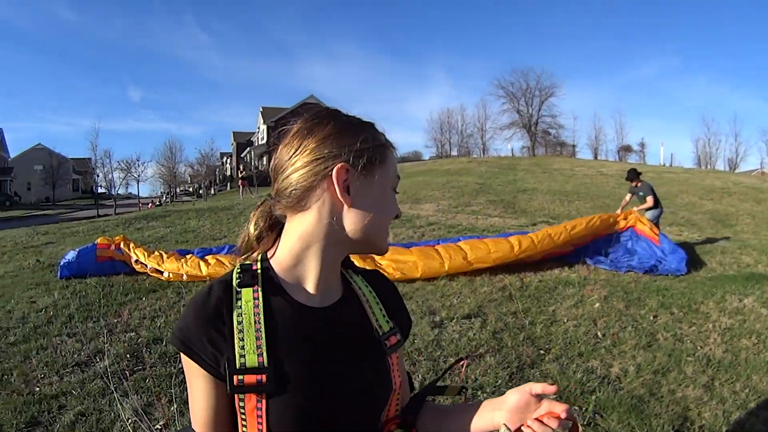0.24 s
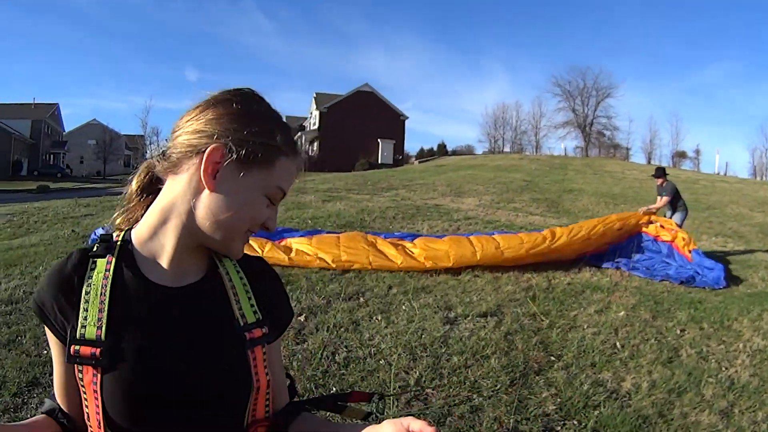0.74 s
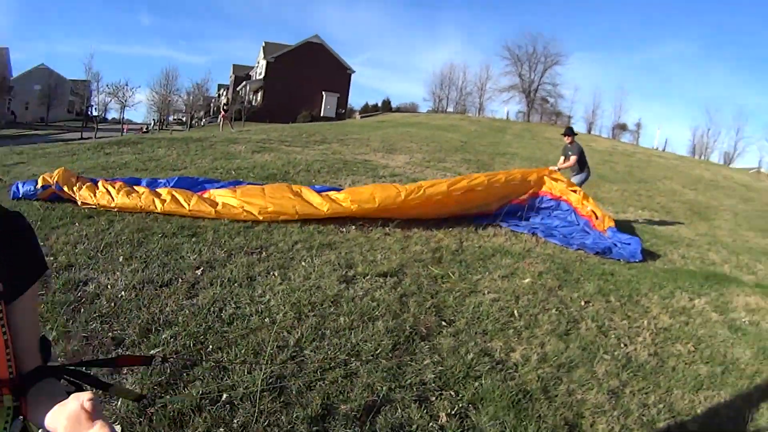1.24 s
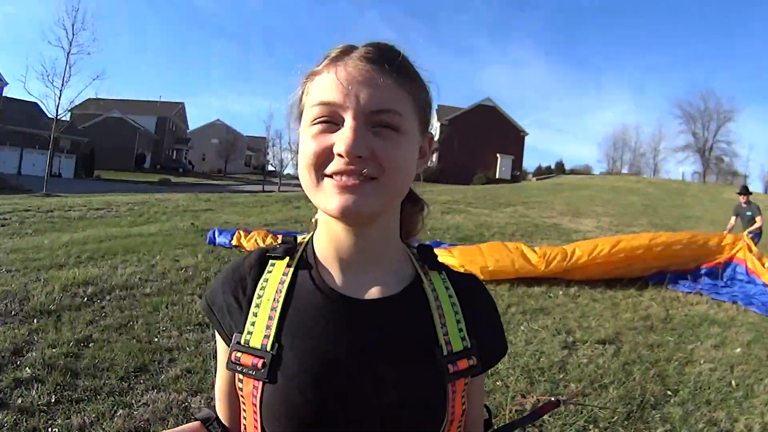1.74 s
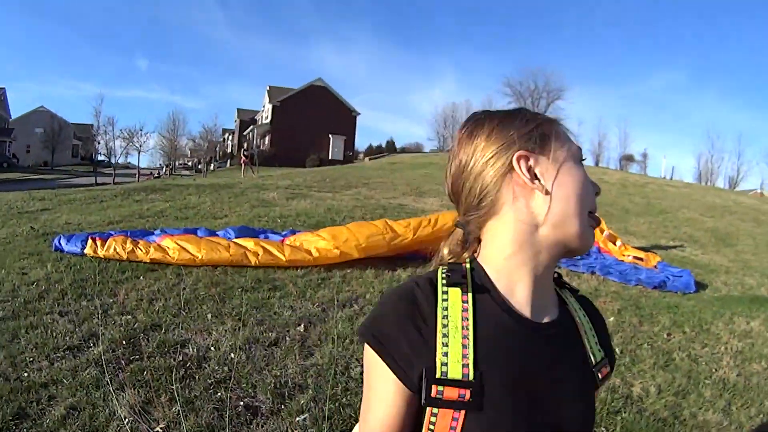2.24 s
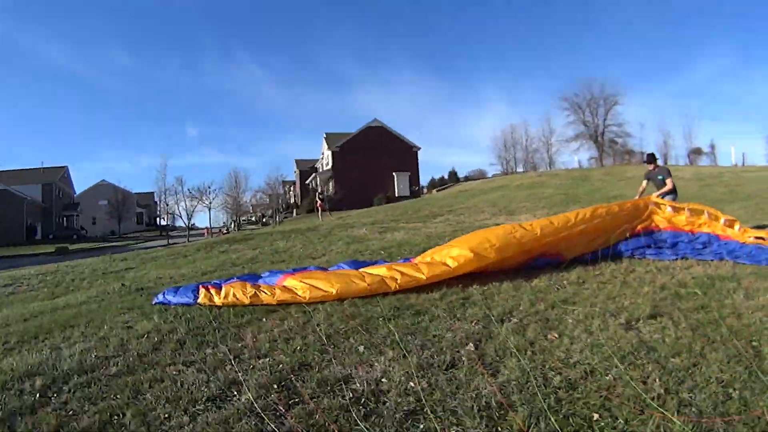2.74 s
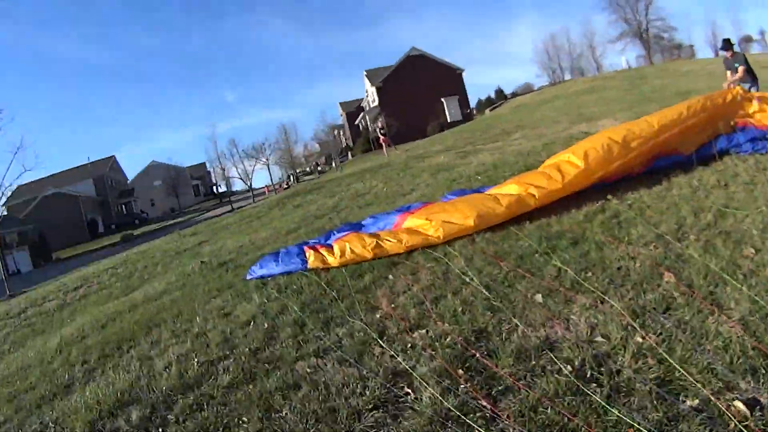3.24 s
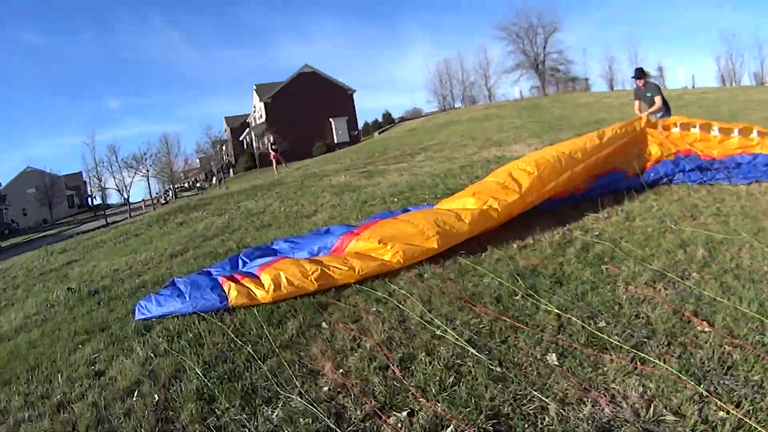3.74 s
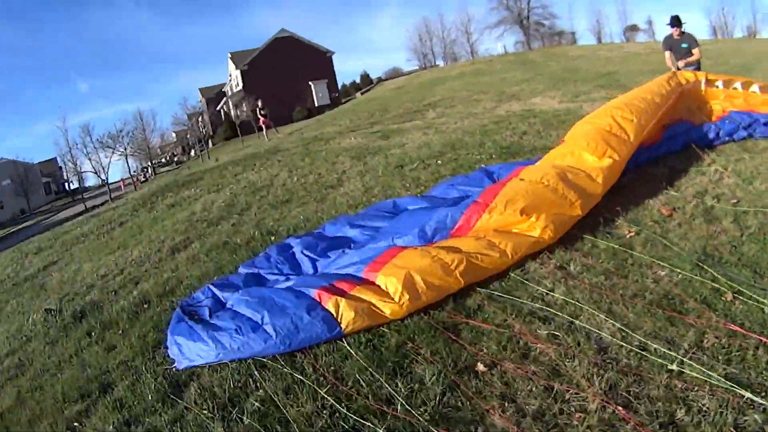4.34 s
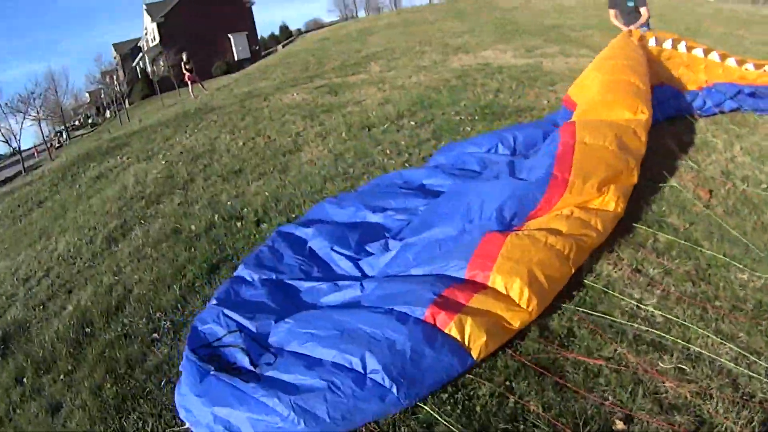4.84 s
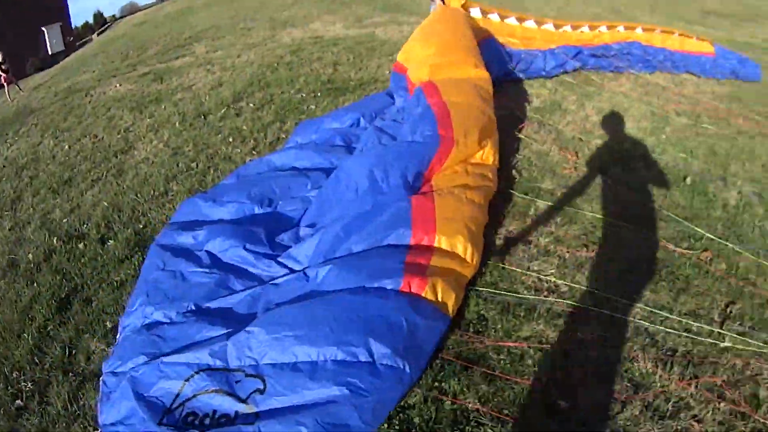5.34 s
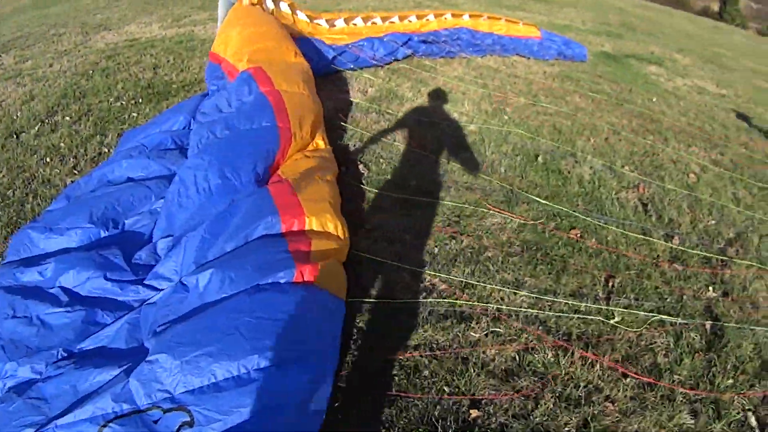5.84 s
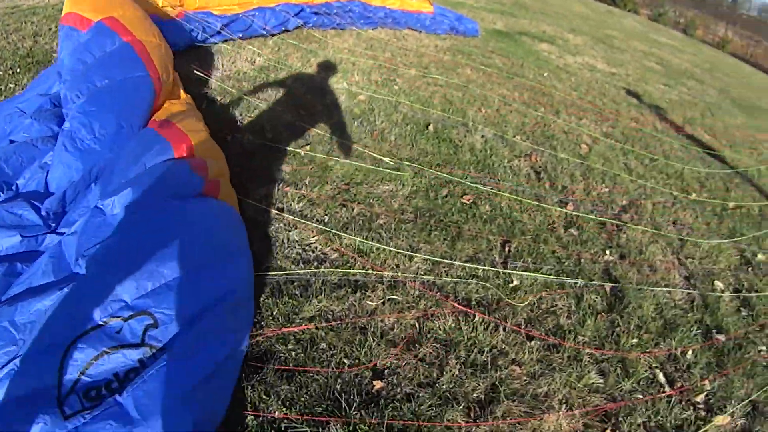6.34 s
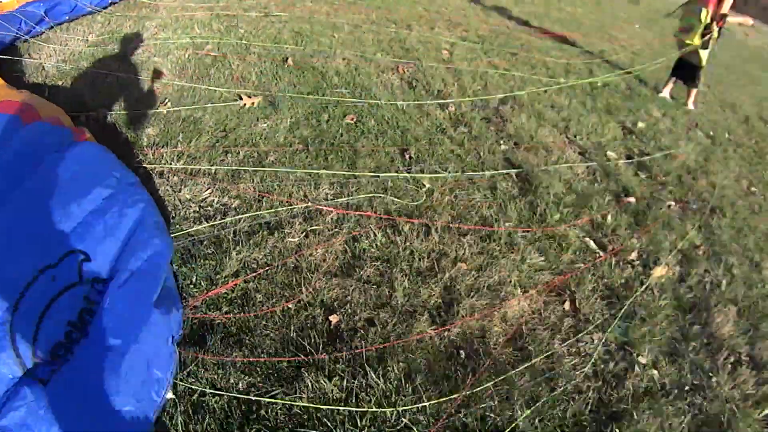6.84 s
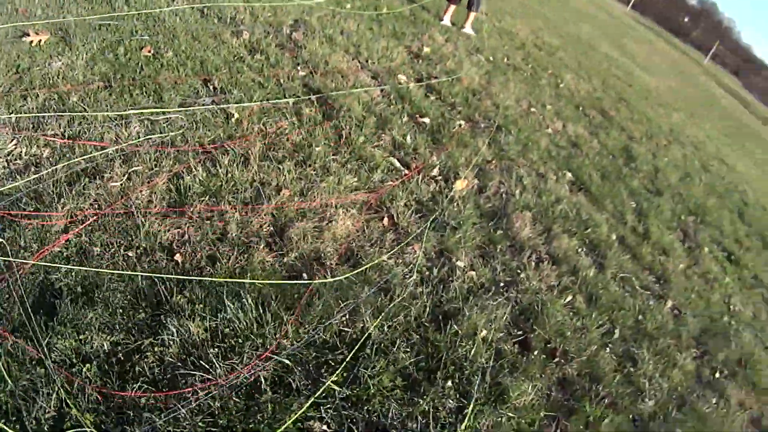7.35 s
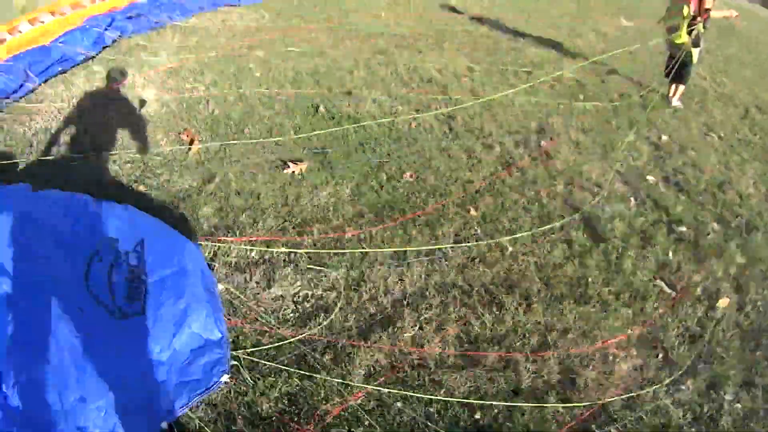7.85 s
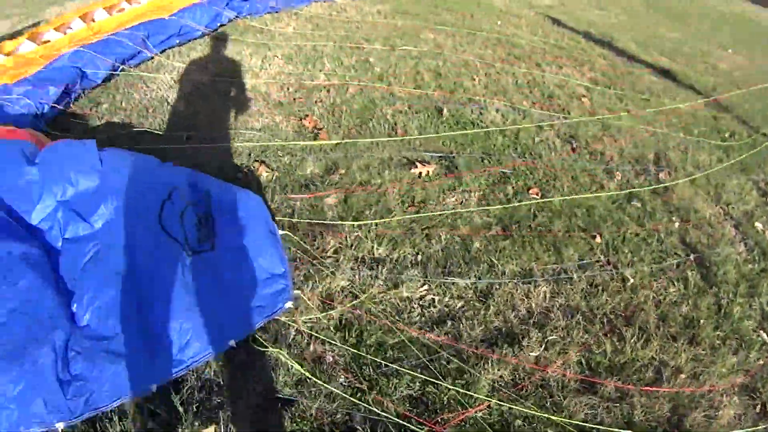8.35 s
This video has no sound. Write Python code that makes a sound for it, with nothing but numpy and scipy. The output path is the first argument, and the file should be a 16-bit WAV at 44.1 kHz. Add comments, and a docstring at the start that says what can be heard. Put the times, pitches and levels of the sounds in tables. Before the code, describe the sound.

Very close stereo pickup from a camera on a short pole. Soft dry fabric hiss starts with small snaps, then a busy stretch of clacks, hollow booms and low mount wobbles, densest around four seconds, with brief cloth swishes between. The second half is mostly a fuller, bright scraping of nylon over grass, with isolated knocks at about seven and eight seconds. Faint wind and far traffic stay almost hidden.

```python
"""Cloth dragged over grass

A nylon wing and its lines are dragged over grass beside a hand-held camera on a short pole.
The cloth hisses and crackles as filtered noise with sparse pops, and its creases snap as short noise bursts.
Knocks on the pole excite decaying modes of the camera, jolts of the hand swing its mount at one low pitch,
and a few faint pitched taps and a low wash of wind and far traffic complete the two-channel scene.
"""
import sys
import numpy as np
from scipy import signal
from scipy.io import wavfile
from scipy.ndimage import uniform_filter1d

SR = 44100
rng = np.random.default_rng(int(sys.argv[2]) if len(sys.argv) > 2 else 0)


def file_out(sig):
    """Save sig as 16-bit WAV at sys.argv[1]."""
    # one column per channel
    cols = np.atleast_2d(sig).T
    # limit, then scale
    lim = np.clip(cols, -1, 1)
    pcm = np.round(lim * 32767).astype(np.int16)
    wavfile.write(sys.argv[1], SR, pcm)


N = 379260

# open-field background, relative spectrum: f/Hz, level/dB per Hz
AIR_SPECTRUM = [(8.8, -47), (15, -23), (59, -1), (82, -16), (249, -10.5), (291, -13), (494, -10.5),
                (538, -13.5), (900, -18.5), (1170, -17), (1980, -120)]
# two microphone ports in one case, likeness (limited to 0-1 in use): f/Hz, likeness
PORT_LIKENESS = [(60, 3), (130, 1.7), (270, 0), (570, .5), (1200, 0.9), (2600, 0.37), (5500, 0.71),
                 (11000, 0.3)]
# phase between the ports: f/Hz, lead of the left/rad
PORT_LEAD = [(60, -1), (260, -1.5), (520, -3.5), (950, -1), (1500, -1.84), (2200, 0.17), (4700, -0.47),
             (11000, 0.5)]
# balance between the ports: f/Hz, left-right level/dB
PORT_BALANCE = [(60, 2), (110, -3), (190, 0), (350, 0), (620, 1.5), (1120, -1.5), (2010, -3.5),
                (3620, -2.5), (6500, -3), (11700, -4.5)]
# jolts of the hand that set the mount swinging: t/s of peak, level/dB
JOLTS = [(.34, -50), (.49, -54), (.79, -49), (.98, -60), (1.11, -58), (1.24, -27), (1.3, -26), (1.37, -32),
         (1.51, -33), (1.57, -38), (1.7, -35), (1.86, -38.5), (1.95, -36), (2.1, -24.5), (2.32, -21),
         (2.559, -39), (2.67, -48), (2.8, -36.5), (2.859, -27), (3.01, -50), (3.22, -32), (3.35, -37),
         (3.45, -42), (3.56, -23.5), (3.72, -32), (3.83, -43), (3.93, -27.5), (4.079, -33.5), (4.27, -34),
         (4.39, -30), (4.45, -24), (4.6, -36), (4.71, -34), (4.778, -29.5), (4.89, -42), (5.04, -37.5),
         (5.21, -27), (6.93, -41.5), (7.07, -46.5), (7.2, -45), (7.41, -52), (7.65, -63), (7.87, -42),
         (7.95, -26.5), (8.16, -50), (8.3, -41), (8.37, -37)]
# faint pitched taps and squeaks: t/s, level/dB, f/Hz, t60/s
TAPS = [(2.354, -38.5, 1147, 0.22), (2.38, -38, 1097, .12), (2.412, -38, 1086, 0.071),
        (6.383, -33.5, 870, 0.038), (6.4, -38, 874, 0.04), (6.492, -37.5, 944, 0.057),
        (8.474, -30.5, 865, 0.041)]
# knocks: t/s, strength/dB, then level/dB re strength of the thud (lowest modes), boom (hollow mode),
# shell (upper modes), tick (top modes and scuff)
KNOCKS = [(0.229, -40.5, -19, -19, -2, -3), (0.279, -45.5, -10, -2, -1, -4), (0.768, -48, -14, -3, 1, 2),
          (1.081, -37, -10, -10, -7, -6), (1.202, -31.5, -7, -0.5, -5, -2), (1.221, -22, -8, 0, -4, -1.5),
          (1.23, -19, -21, -9, -3, -8), (1.248, -28.5, -16, -9, -4, -3), (1.263, -27, -19, -14, -6, -7),
          (1.279, -21.5, -23, -20, -7, -13), (1.294, -20, -23, -15.5, -6.5, -12),
          (1.356, -34, -11, -6.5, -2, -6), (1.49, -41, 1, 3, -8, -8), (1.51, -25, -14, -5.5, -14, -14),
          (1.536, -30.5, -10, -9, -7, -14), (1.615, -25, -17, -11, -7, -13), (1.642, -36, -10, -4, 8, -2),
          (1.684, -42, -3, 4.5, 9, -1), (1.804, -28, -10, 0, -6, -11), (1.835, -37, -9, -7, -3, -7),
          (1.912, -31.5, -4, -12, -6, -16), (1.935, -17, -12.5, -18.5, -11, -17),
          (2.058, -39, -1, -5, -5, -4), (2.082, -24.5, -23, -10.5, -2.5, -1.5),
          (2.107, -36.5, -6, 1.5, -4, -7), (2.141, -49, -8, -11, 10, 15),
          (2.296, -14.5, -3, -5.5, -10, -19), (2.313, -34.5, 11, 10, -10, -15),
          (2.681, -37, -20, -19, 3, -6), (2.836, -34.5, -11, -5, -8, -9), (2.874, -40, -4, -7, -4, -4),
          (3.146, -36, -17, -13, -7, -6), (3.199, -39.5, -6, -5.5, -4, -2), (3.237, -32, -9, -12, -13, -13),
          (3.295, -39, -10, -3, -2, -7), (3.343, -37, -8, -9, 1, -7), (3.369, -36, -10, -3.5, 3, -7),
          (3.447, -54, 6, 0, 12, 12), (3.539, -14, -8.5, -7.5, -10.5, -18), (3.576, -32, -5, -7, -5, -12),
          (3.626, -31, -15, -16, -8, -16), (3.66, -25.5, -17, -15, -4, -12),
          (3.691, -17, -27, -20, -9.5, -14), (3.728, -32.5, -21, -18, 7, 4),
          (3.771, -45.5, -15, -14, 16, 14), (3.789, -42.5, -17, -10, 17, 8),
          (3.929, -35.5, -10, -9, 5.5, -10), (3.946, -21, -22.5, -17, -10, -18),
          (3.967, -26, -21, -12, -10, -17), (3.975, -22.5, -26, -15, -6, -13),
          (3.995, -31, -20, -9, -14, -12), (4.039, -34, -9, -5, -1, -5), (4.167, -42.5, -14, -12, 6, 7),
          (4.256, -37, -9, 2.5, -6, -10), (4.266, -28, -10, -17, -7, -15),
          (4.318, -16.5, -18, -14, -10.5, -16), (4.35, -25, -22, -13, -12, -18),
          (4.404, -21.5, -15, -11, -3, -6), (4.427, -17, -28, -9, -6, -4.5),
          (4.475, -25.5, -12, -7, 11, 3.5), (4.534, -27, -10, -1, -1.5, -5),
          (4.629, -34, -22, -14, -7, -7.5), (4.706, -19.5, -15, -19.5, -9, -15),
          (4.795, -40, -18, -19, 9, 6), (4.887, -47.5, -3, 8, 4, 13), (4.913, -41.5, -4, 1, 1, 6),
          (5.023, -31.5, -7, -6, -4, -8), (5.188, -23, -25, -12, 2.5, -0.5), (5.62, -49, -4, -8, 7, 4),
          (6.759, -49, -18, -13, 6, 6), (6.905, -52.5, 3, 3, 10, 13), (7.033, -40.5, -15, -13, 0, -3),
          (7.068, -40, -15, -15, -3, 1), (7.177, -27.5, -11.5, -9.5, -8, -14),
          (7.739, -36, -20, -12, -0.5, 0), (7.821, -40, -7, 3, -3, 3),
          (7.931, -16.5, -13, -16.5, -9.5, -10.5), (8.285, -28, -10.5, -4, -7, -10),
          (8.366, -58, -12, -7, 12, 13), (8.589, -49.5, 2, 4, 9, 8)]
# mean modes of the camera on its pole: f/Hz, level/dB, t60/s, left-right level/dB, lead of the left/rad
BODY_MODES = [(131.5, 2, 0.041, -4, 0.1), (201, 2.5, 0.075, -4, -0.41), (294.6, 5.5, 0.088, -1.5, 0.57),
              (513.5, -0.5, 0.044, 7, -1.3), (851, -2.5, 0.034, 6, -1.55), (1157, -6, 0.041, -2, -1.5),
              (1271, -3.5, 0.041, 9.5, -1.2), (1542, -1, 0.052, 1.5, -1.3), (2830, -0.5, 0.023, -3, -0.7),
              (4500, -11, 0.0091, .5, -.2)]
# drive of each mode: 0 strength alone, 1 plus thud, 2 plus boom, 3 plus shell, 4 plus tick
MODE_DRIVE = [1, 1, 2, 0, 0, 3, 3, 3, 4, 4]
# creases snapping near the camera: t/s, peak level/dB, centre f/Hz, left-right level/dB
SNAPS = [(0.1336, -32, 4720, -8), (0.532, -27, 4060, -3), (0.5495, -34, 5120, 2), (0.5761, -29, 5070, -0.5),
         (0.617, -25, 3600, 2), (0.6734, -19.5, 5100, 0.0), (0.844, -46, 4930, 4), (1.053, -46, 4720, 10),
         (1.122, -32, 5160, 7), (1.1967, -25.5, 7700, 3), (1.2201, -33, 4800, 5), (1.2925, -28, 4100, -2),
         (1.385, -29, 6840, 5), (1.6125, -45, 4290, -1.0), (1.6392, -47, 4160, -5),
         (1.863, -35, 6700, -1.0), (1.915, -29, 4890, -1.0), (2.085, -25, 3600, 0.5),
         (2.1883, -30, 5100, 5), (2.3534, -33, 4760, -2), (2.401, -26.5, 6340, -8),
         (2.659, -29.5, 4390, -6), (2.6874, -29, 4690, -5), (3.0525, -32, 4850, -1),
         (3.0794, -29, 4820, -2), (3.1418, -18.5, 4630, 5), (3.1744, -24, 5000, 2), (3.4266, -30, 6890, 4),
         (3.4655, -25, 5140, -1.0), (3.4772, -21, 3950, -3), (3.6635, -31, 4480, -1.0),
         (3.6681, -32, 6490, 1), (3.683, -21, 6600, 7), (3.7075, -16.5, 6350, 14),
         (3.7237, -16.5, 6700, -5), (3.742, -20.5, 6100, 12), (3.789, -34, 4390, -0.5),
         (3.805, -24, 4370, 7), (4.098, -19, 6760, 7), (4.2652, -34, 5370, 6), (4.4066, -24, 3740, 0.5),
         (4.4283, -40, 5260, 0.0), (4.4752, -26, 4370, 1.0), (4.4917, -17, 8000, -5),
         (4.7127, -24, 4780, -3), (5.4919, -30, 5370, 0.0), (5.9643, -31.5, 5150, -2),
         (6.6149, -30, 4230, 9), (6.676, -31, 5100, 8), (7.56, -26, 4820, 3.0)]
# relative spectrum of the cloth: f/Hz, level/dB per Hz
CLOTH_SPECTRUM = [(350, -33), (600, -17), (910, -10), (1070, -9.5), (1120, -6.5), (1680, -0.5), (1920, 0),
                  (3410, -9.5), (4870, -6), (5710, -10.5), (6620, -9.5), (8150, -14), (9100, -11.5),
                  (10000, -13.5), (11200, -24.5), (14600, -54), (22000, -120)]
# steady drag, relative course: t/s, hiss level/dB, deep rustle level/dB re hiss, sheen level/dB re hiss,
# left-right level/dB
DRAG = [(0, -43.5, -14, -9, -2), (.25, -45.5, -9, -6, -1.5), (.48, -49, -9, -7.5, -2),
        (.75, -44, -11, -7, -1), (1.05, -47, -10.5, -8, -2), (1.4, -44.5, -8, -4.5, -1.5),
        (1.7, -44.5, -5, -10.5, -2.5), (2.3, -46.5, -4.5, -5.5, -2), (2.75, -45, -6.5, -9, -2.5),
        (3, -47, -7.5, -7, -2.5), (3.6, -44, -4.5, -7, -2.5), (4.3, -43, -8, -10.5, -3),
        (4.599, -39, -8, -3, -1.5), (4.78, -43, -7, -2.5, -0.5), (5.1, -38, -9.5, -2, -0.5),
        (5.28, -39.5, -9.5, -3.5, -1), (5.43, -43.5, -7, -4, -.5), (5.55, -40.5, -13, -5, -0.5),
        (5.75, -40.5, -11, -4, 0), (5.95, -40.5, -12.5, -4, -1), (6.12, -36, -15, -5, -0.5),
        (6.5, -39, -12, -4.5, 0), (6.66, -43.5, -10.5, -7, 0), (6.75, -38, -13, -5, 0),
        (7, -39, -15, -7, -4), (7.18, -43, -11, -8, 2.5), (7.35, -38, -12.5, -8, 2),
        (7.75, -37, -13, -5.5, 1), (7.92, -38.5, -11.5, -8.5, 1), (8.1, -37.5, -13, -6, 1.5),
        (8.45, -38, -12.5, -7.5, 0), (8.6, -37, -17, -7, 0)]
# short sweeps of cloth and grass: t/s of peak, relative hiss level/dB, build-up/s, dying/s,
# sheen level/dB re hiss
SWISHES = [(.58, -47, 0.055, 0.087, -2), (.68, -37.5, 0.033, 0.023, -12), (1.13, -40.5, 0.013, 0.12, -3),
           (1.23, -35.5, .02, 0.15, -22), (1.88, -47, 0.041, 0.087, 0.5), (2.1, -40.5, .02, 0.079, -15),
           (2.25, -54, 0.02, 0.024, 4), (2.39, -45, 0.024, 0.022, -19), (2.69, -44.5, 0.038, 0.036, -7),
           (3.1, -38, .03, 0.042, -5), (3.47, -36.5, 0.029, .03, -4.5), (3.72, -36.5, 0.046, 0.046, -2.5),
           (3.82, -40, 0.033, 0.04, -4), (3.95, -46, 0.045, 0.043, -1), (4.11, -37.5, .05, 0.11, -2),
           (4.47, -39.5, 0.044, 0.23, -6), (4.84, -33, 0.0089, 0.019, 1), (4.92, -30.5, .04, 0.019, -8),
           (5.02, -38, 0.037, 0.031, -10), (5.17, -40, 0.037, 0.035, -11), (6.81, -40, .03, 0.044, -11)]


def gain_of(db):
    """Level law: amplitude gain is 10 to the power dB / 20."""
    return 10 ** (np.asarray(db) / 20)


def evened(x):
    """Normalization to unit rms over all channels together."""
    return x / np.sqrt(np.mean(x ** 2) + 1e-20)


def smoothed_twice(x, size):
    """Low-pass by two equal moving averages, whose joint window is triangular."""
    return uniform_filter1d(uniform_filter1d(x, size=size), size=size)


def patterned(x, bins, frames):
    """Random field correlated over neighbouring frequency bins and time frames, at unit rms."""
    x = uniform_filter1d(x, size=bins, axis=0)
    return evened(uniform_filter1d(x, size=frames, axis=1))


def read(points, hz):
    """Linear interpolation of a spectrum along a logarithmic frequency axis."""
    f, value = np.transpose(points)
    return np.interp(np.log(hz + 1), np.log(f + 1), value)


def add(mix, s, sound):
    """Superposition of a two-channel sound into the mix at time s."""
    part = mix[:, round(s * SR):][:, :sound.shape[1]]
    part += sound[:, :part.shape[1]]


def through_ports(field_db, size, source=None):
    """Partial coherence: two-port noise from a dB field (bins x frames), optionally given the left source."""
    hz, hop = np.fft.rfftfreq(size, 1 / SR), size // 4
    a, b, c, d = rng.standard_normal((field_db.shape[1], len(hz), 4)).T
    left = (a + 1j * b) if source is None else source
    same = np.clip(read(PORT_LIKENESS, hz), 0, 1)[:, None]
    random_phase = np.exp(1j * np.arctan2(c, d))
    right = same * left + np.sqrt(1 - same ** 2) * abs(left) * random_phase
    # half of the balance and lead on each port
    half_gain = gain_of(read(PORT_BALANCE, hz) / 2)
    tilt = (half_gain * np.exp(.5j * read(PORT_LEAD, hz)))[:, None]
    z = np.array([left * tilt, right / tilt]) * gain_of(field_db)
    return signal.istft(z, nperseg=size, noverlap=size - hop)[1][:, :N]


def field(level_db=-55.5):
    """Stationary noise of fixed spectrum: the low wash of wind and far traffic."""
    hz = np.fft.rfftfreq(2048, 1 / SR)
    shape_db = read(AIR_SPECTRUM, hz)[:, None] + np.zeros(N // 512 + 5)
    return gain_of(level_db) * evened(through_ports(shape_db, size=2048))


def swing_db(rise_db_per_s=595, fall_db_per_s=275, tremor_db=-65, tremor_spread_db=7):
    """Addition of powers: jolts that grow and decay exponentially, over the faint random tremor of the hand."""
    t = np.arange(0, N / SR + .01, .002)
    at, db = np.transpose(JOLTS)[:, :, None]
    jolt_db = db - np.where(t < at, rise_db_per_s * (at - t), fall_db_per_s * (t - at))
    tremor = evened(smoothed_twice(rng.standard_normal(len(t)), size=20))
    power = gain_of(2 * jolt_db).sum(0) + gain_of(2 * (tremor_db + tremor_spread_db * tremor))
    return np.interp(np.arange(N) / SR, t, 10 * np.log10(power))


def sway(sway_hz=60.2, waver=0.0395, rumble_db=-7.5, rumble_hz=(30, 110), apart_db=-13.0):
    """Resonance of the mount at one wavering low pitch, with a shaking rumble partly unlike at the two ports."""
    drift = evened(smoothed_twice(rng.standard_normal(N), size=2000))
    turns = np.cumsum(sway_hz * (1 + waver * drift)) / SR
    port_phase = np.array([[-.25], [.25]])  # rad
    ring = np.sqrt(2) * np.sin(2 * np.pi * turns + port_phase) * gain_of([[-1.2], [1.2]])
    band = signal.butter(2, rumble_hz, "bandpass", fs=SR, output="sos")
    shared, apart = evened(signal.sosfilt(band, rng.standard_normal((2, N))))
    rumble = gain_of(rumble_db) * (shared + gain_of(apart_db) * np.array([apart, -apart]))
    return gain_of(swing_db()) * (ring + rumble)


def taps(rise_s=0.0016):
    """Free decay of a single mode after a soft onset: faint pitched taps and squeaks."""
    out, t = np.zeros((2, N)), np.arange(round(.1 * SR)) / SR
    for s, db, hz, t60 in TAPS:
        envelope = (1 - np.exp(-t / rise_s)) * gain_of(db - 60 * t / t60)
        ring = envelope * np.sin(2 * np.pi * hz * t)
        add(out, s, ring * gain_of([[2.5], [-2.5]]))
    return out


def knocks(scatter_db=2.5, detune=0.038, skew=0.2, apart=0.47,
           blow_s=0.00034, scuff_db=-3.5, scuff_s=.012, scuff_hz=(900, 4170)):
    """Modal excitation: each blow sets the damped modes of the camera ringing, with a scuff of noise."""
    out, t = np.zeros((2, N)), np.arange(round(.16 * SR)) / SR
    chance = rng.standard_normal((len(KNOCKS), len(BODY_MODES), 4))
    band = signal.butter(2, scuff_hz, "bandpass", fs=SR, output="sos")
    noise = rng.standard_normal((len(KNOCKS), 3, len(t)))
    port_noise = noise[:, :1] + apart * noise[:, 1:]  # shared part plus each port's own
    scuffs = evened(signal.sosfilt(band, port_noise)) * np.exp(-t / scuff_s)
    rise = 1 - np.exp(-t / blow_s)
    for (s, strength_db, *colour_db), draws, scuff in zip(KNOCKS, chance, scuffs):
        scuff_level_db = strength_db + colour_db[-1] + scuff_db + np.array([[1.5], [-1.5]])
        add(out, s, rise * gain_of(scuff_level_db) * scuff)
        for (hz, db, t60, pan_db, lead), drive, (a, b, c, d) in zip(BODY_MODES, MODE_DRIVE, draws):
            ports = gain_of(np.array([pan_db, -pan_db]) / 2) * np.exp(.5j * np.array([lead, -lead]))
            ports = ports / abs(ports.mean())
            ports = (ports * np.exp(1j * skew * d * np.array([1, -1])))[:, None]
            ring = np.exp(2j * np.pi * hz * (1 + detune * b) * t + .5j * c)
            mode_db = strength_db + (0, *colour_db)[drive] + db + scatter_db * a
            add(out, s, rise * gain_of(mode_db - 60 * t / t60) * (ports * ring).imag)
    return out


def snaps(length_s=0.0013, width=0.33):
    """Impulsive release of a crease: a millisecond of noise band-passed around one bright pitch."""
    out, t = np.zeros((2, N)), np.arange(400) / SR
    noise = rng.standard_normal((len(SNAPS), len(t)))
    for (s, db, hz, pan_db), burst in zip(SNAPS, noise):
        edges = [hz * (1 - width / 2), min(hz * (1 + width / 2), SR / 2.1)]
        band = signal.butter(1, edges, "bandpass", fs=SR, output="sos")
        snap = signal.sosfilt(band, burst * np.exp(-t / length_s))
        add(out, s, snap / abs(snap).max() * gain_of(db + np.array([[pan_db], [-pan_db]]) / 2))
    return out


def drag(t, swish_deep_db=-7.5, swish_edge_db=-7.5):
    """Addition of incoherent powers: swishes join the steady drag in hiss, deep rustle and sheen (dB)."""
    s, *columns = np.transpose(DRAG)
    hiss_db, deep_db, sheen_db, pan_db = (np.interp(t, s, c) for c in columns)
    at, db, rise_s, fall_s, bright_db = np.transpose(SWISHES)[:, :, None]
    # a swish lies at its edge level one build-up or dying time from the peak
    distance = np.where(t < at, (at - t) / rise_s, (t - at) / fall_s)
    swish_db = db + swish_edge_db * distance ** 1.18
    steady, swish = gain_of(2 * hiss_db), gain_of(2 * swish_db)
    hiss = steady + swish.sum(0)
    deep = steady * gain_of(2 * deep_db) + swish.sum(0) * gain_of(2 * swish_deep_db)
    sheen = steady * gain_of(2 * sheen_db) + (swish * gain_of(2 * bright_db)).sum(0)
    return 10 * np.log10(hiss), 10 * np.log10(deep / hiss), 10 * np.log10(sheen / hiss), pan_db


def fibre_grit(crackle_db, spread_db, per_s):
    """Shot noise on a continuous noise: tiny creases popping at random times over dense fibre hiss."""
    count = N + 512
    heights = gain_of(spread_db * np.minimum(rng.exponential(1, count), 6))
    pops = (rng.random(count) < per_s / SR) * heights
    crackle = evened(pops * rng.choice([-1, 1], count))
    return evened(rng.standard_normal(count) + gain_of(crackle_db) * crackle)


def cloth(crackle_db=-14.5, spread_db=3.5, per_s=830.0, patchy_db=0.97, flicker_db=0.33, raise_db=2.5):
    """Friction noise: hiss and pops coloured by the cloth and the case, with a spectrum that follows the drag."""
    hz, t = np.fft.rfftfreq(256, 1 / SR), np.arange(N // 64 + 5) * 64 / SR
    hiss_db, deep_db, sheen_db, pan_db = drag(t)
    grit = fibre_grit(crackle_db, spread_db, per_s)
    source = signal.stft(grit, nperseg=256, noverlap=192)[2][:, :len(t)]
    patches, flicker = rng.standard_normal((len(t), len(hz), 2)).T
    patches = patterned(patches, bins=4, frames=40)
    flicker = patterned(flicker, bins=40, frames=12)
    deep = np.clip((1500 - hz) / 300, 0, 1)[:, None]  # share of the deep rustle
    sheen = np.clip((hz - 5000) / 2000, 0, 1)[:, None]  # share of the bright sheen
    shape_db = read(CLOTH_SPECTRUM, hz)[:, None] + patchy_db * patches + flicker_db * flicker
    # only departures from the median recolour the cloth
    shape_db = shape_db + deep * (deep_db - np.median(deep_db)) + sheen * (sheen_db - np.median(sheen_db))
    sound = evened(through_ports(shape_db, size=256, source=source))
    at = np.arange(N) / SR
    pan = np.interp(at, t, pan_db - np.median(pan_db)) / 2
    return gain_of(raise_db + np.interp(at, t, hiss_db) + np.array([pan, -pan])) * sound


def scene():
    """Linear superposition of all sources at the two ports."""
    return field() + sway() + taps() + knocks() + snaps() + cloth()


def record(dry, edge_hz=11130):
    """Band limitation of the recorder by a symmetric low-pass."""
    low_pass = signal.firwin(1023, edge_hz, window=("kaiser", 9), fs=SR)
    return signal.oaconvolve(dry, low_pass[None], "same")


dry = scene()
out = record(dry)
file_out(out)
```